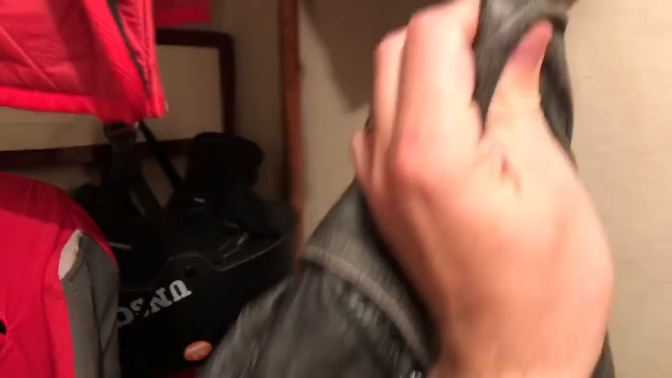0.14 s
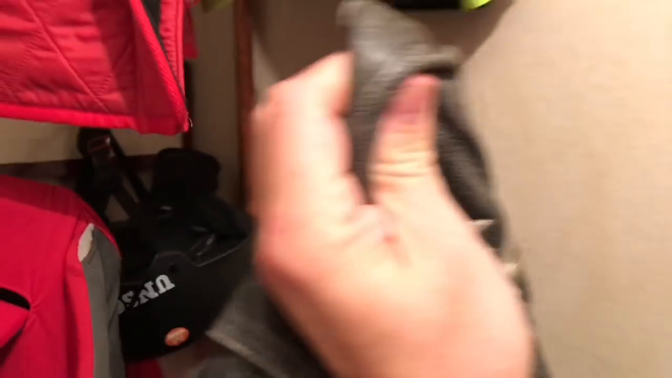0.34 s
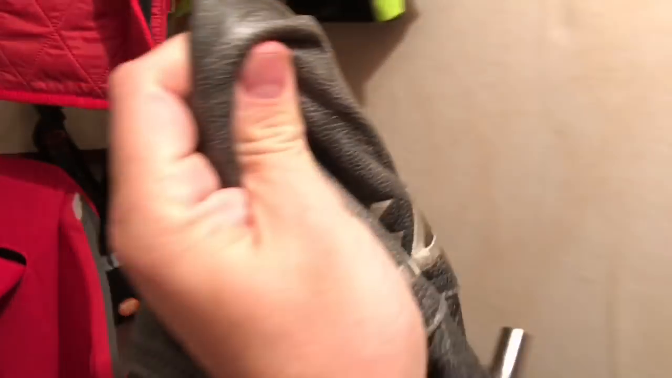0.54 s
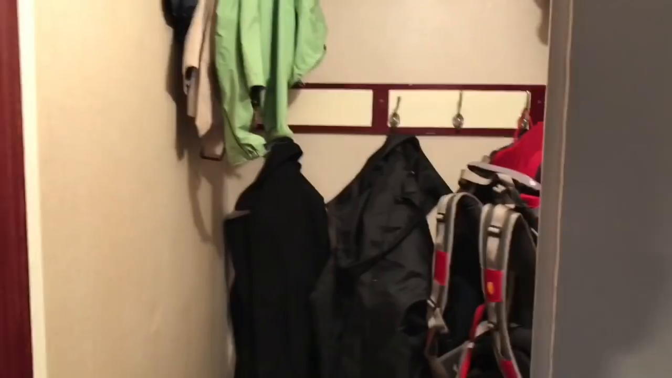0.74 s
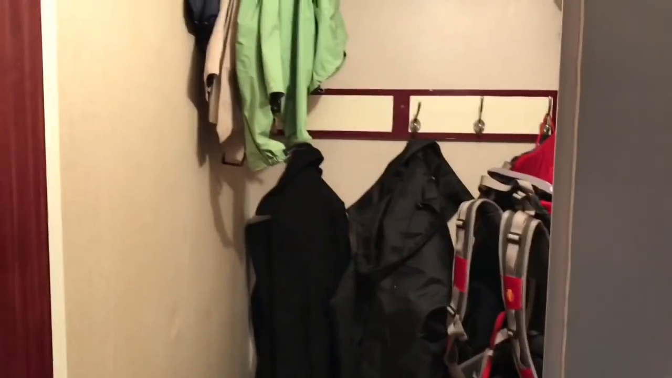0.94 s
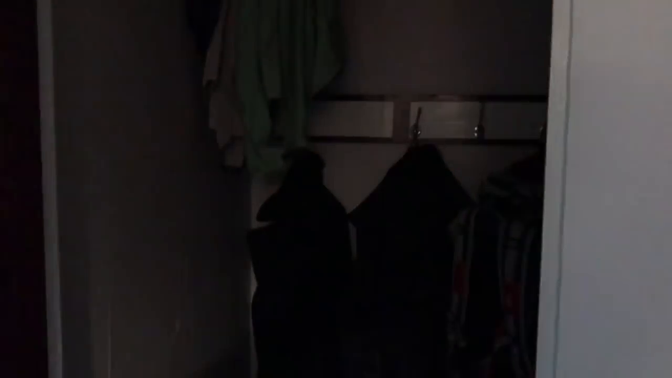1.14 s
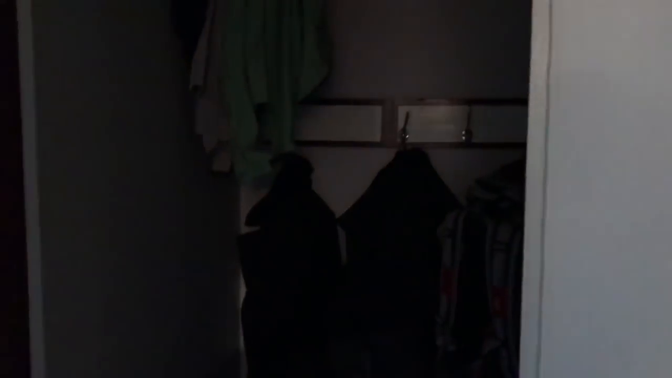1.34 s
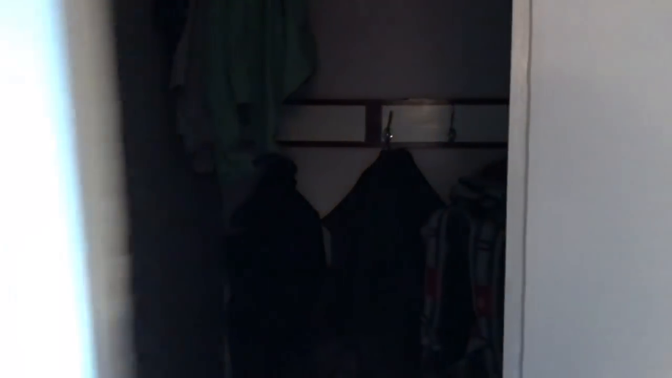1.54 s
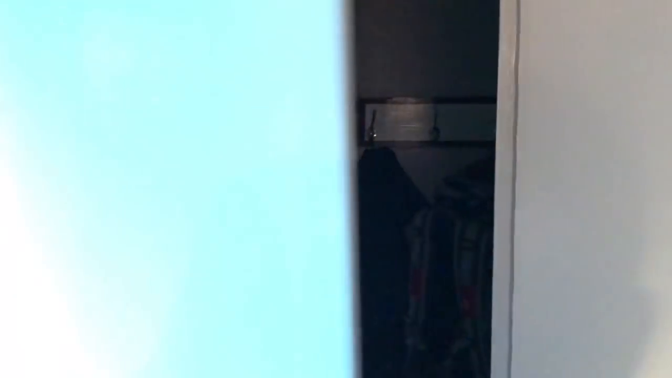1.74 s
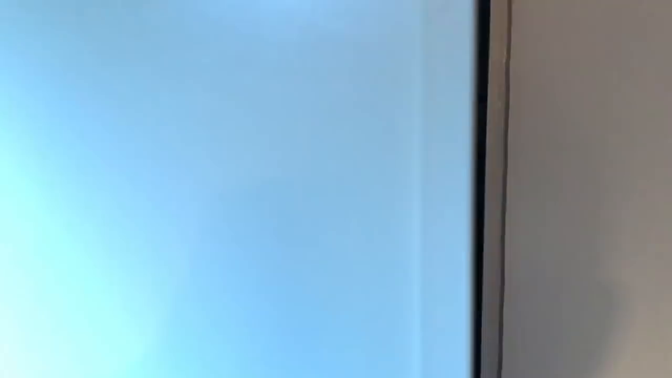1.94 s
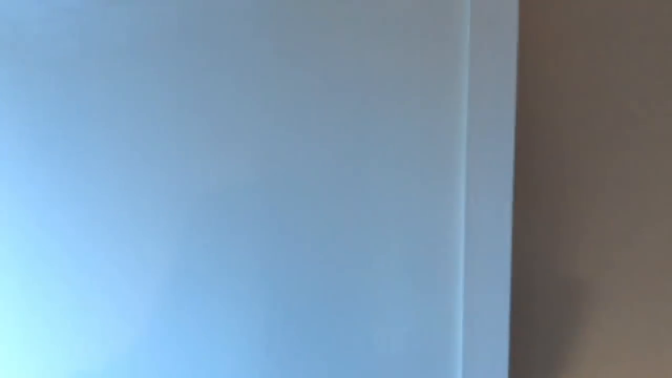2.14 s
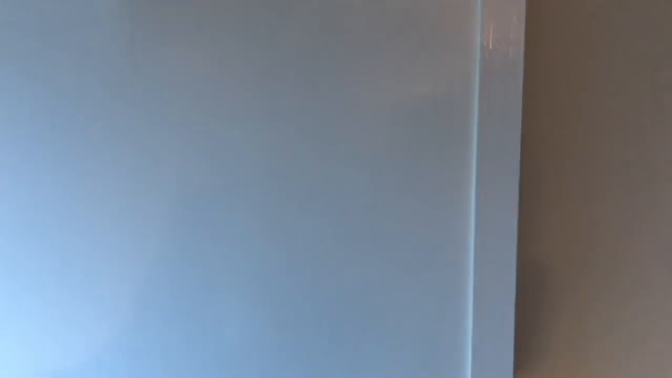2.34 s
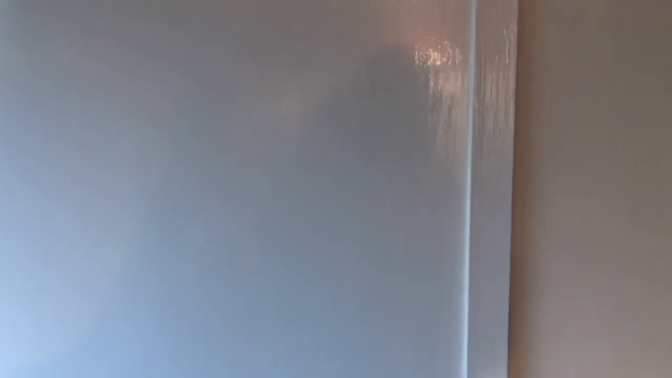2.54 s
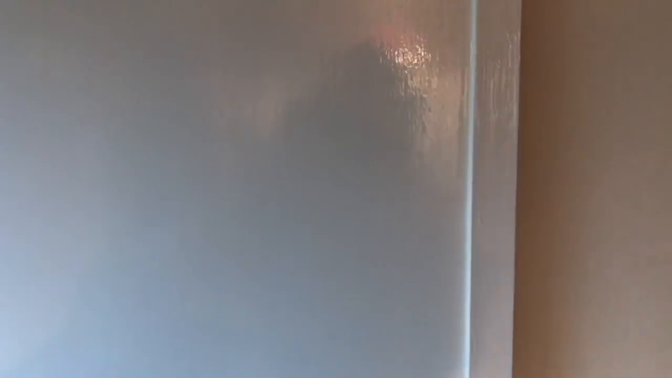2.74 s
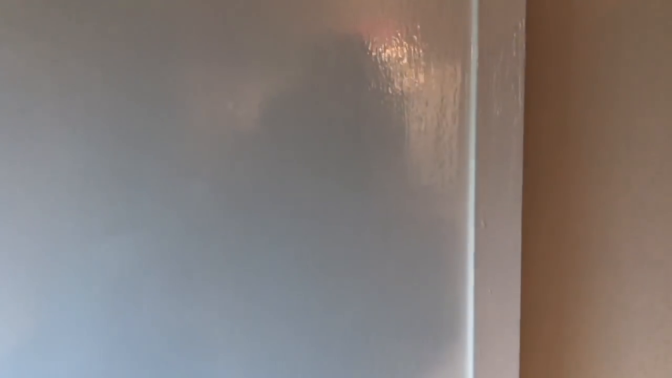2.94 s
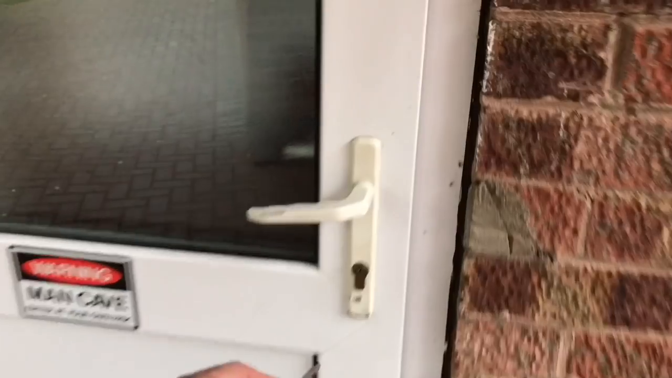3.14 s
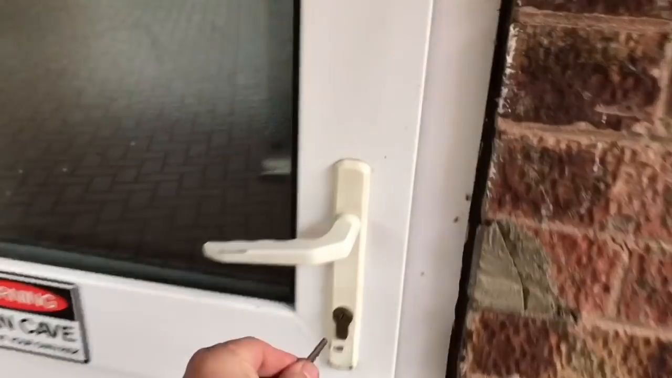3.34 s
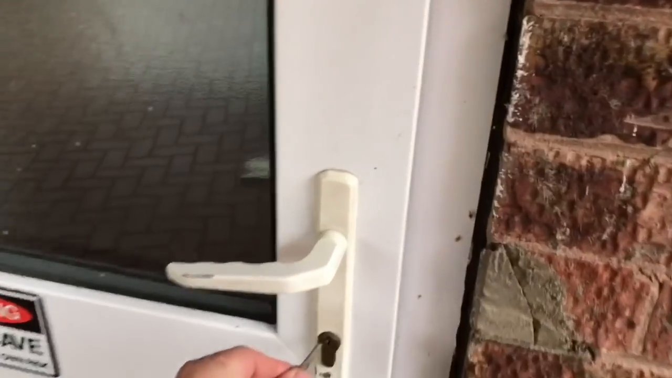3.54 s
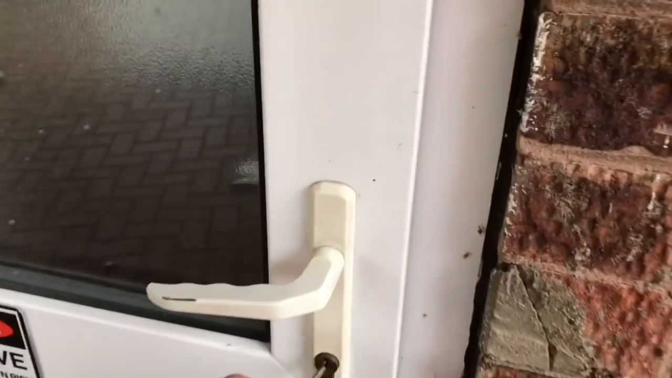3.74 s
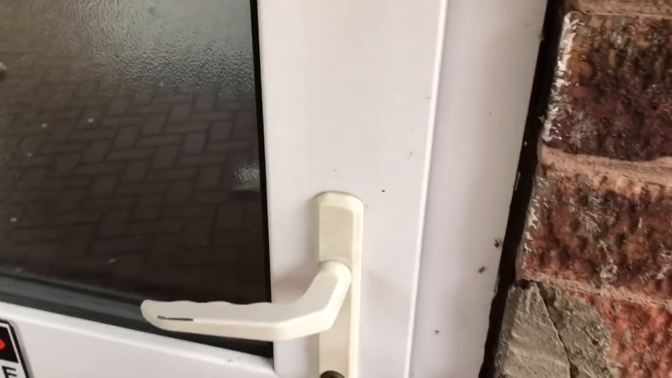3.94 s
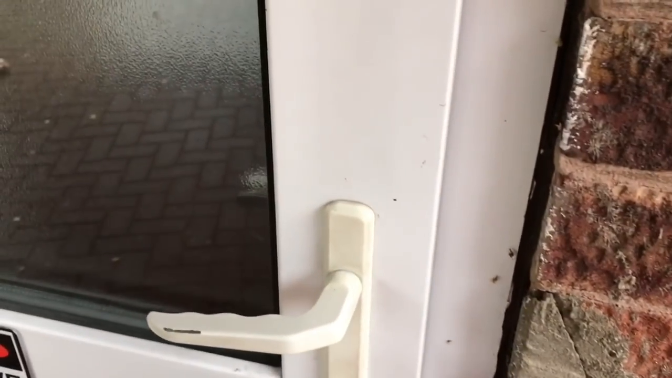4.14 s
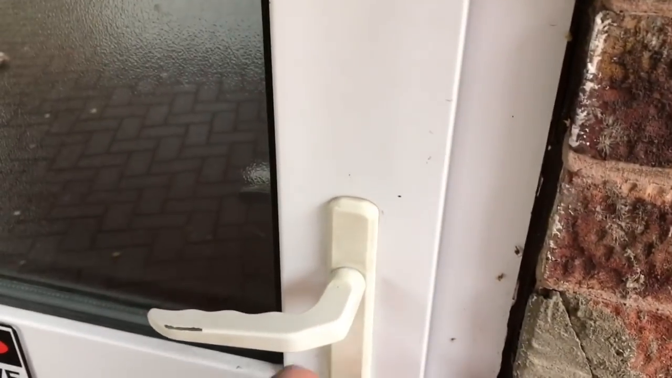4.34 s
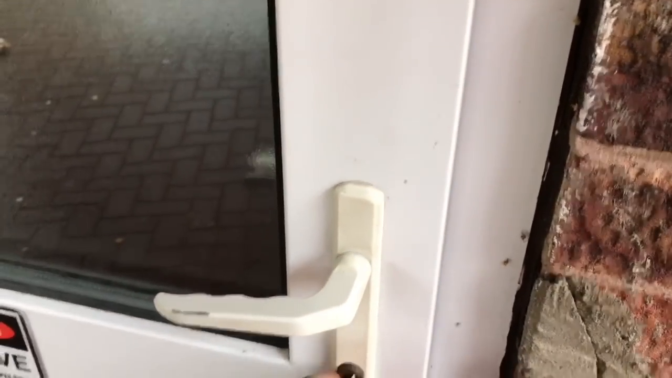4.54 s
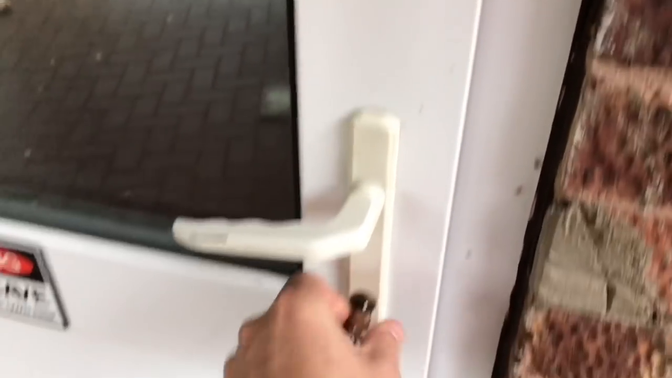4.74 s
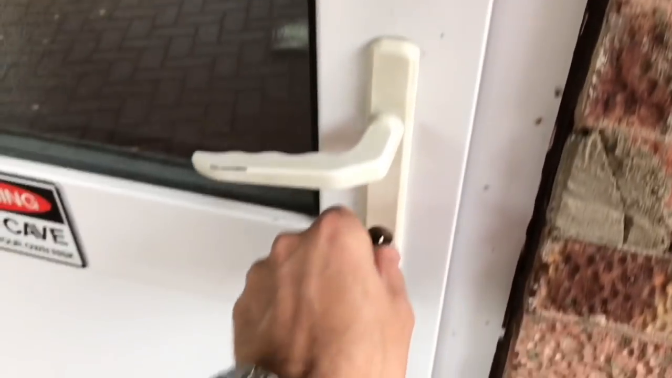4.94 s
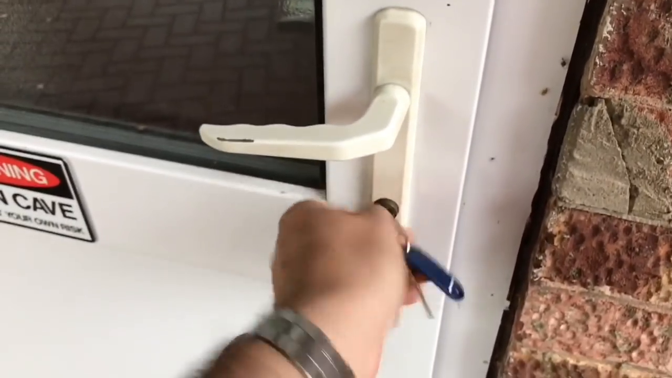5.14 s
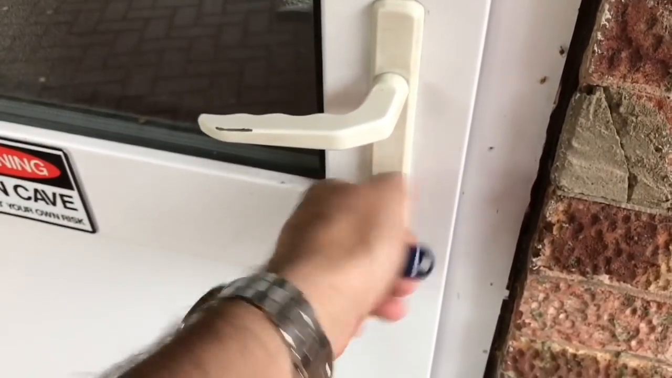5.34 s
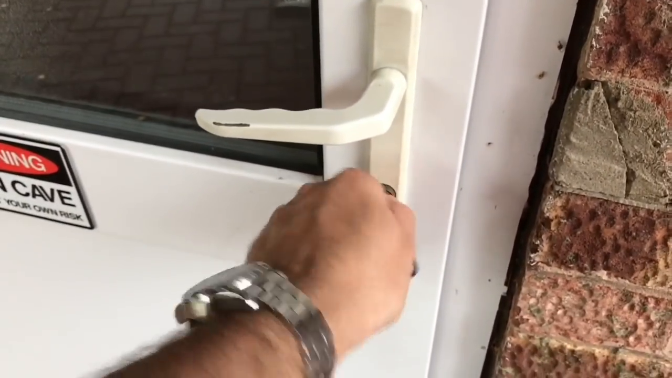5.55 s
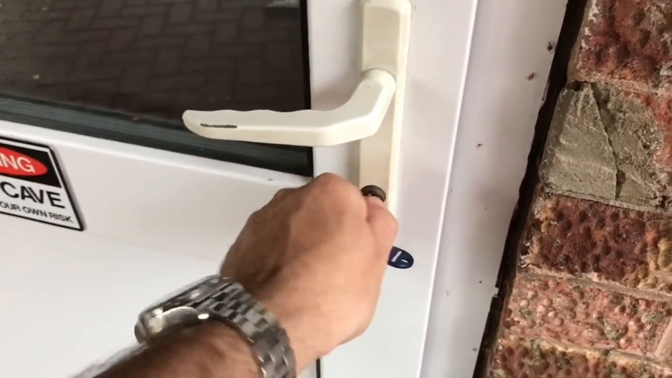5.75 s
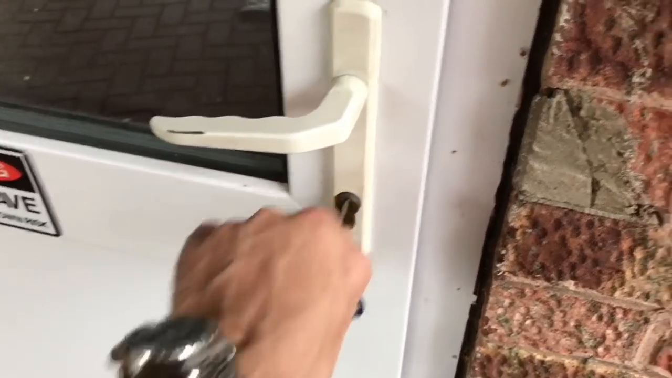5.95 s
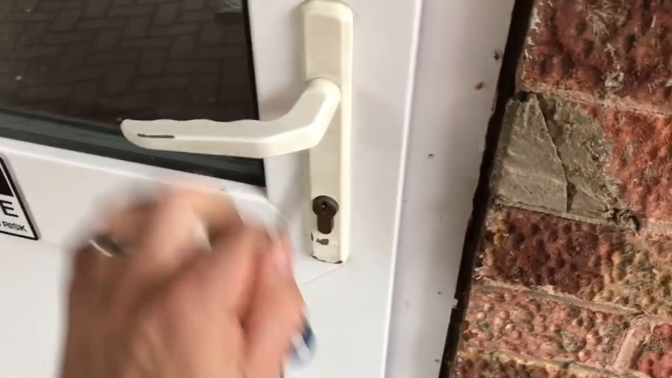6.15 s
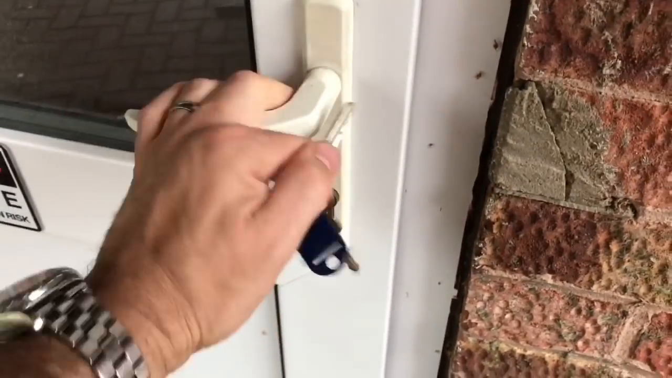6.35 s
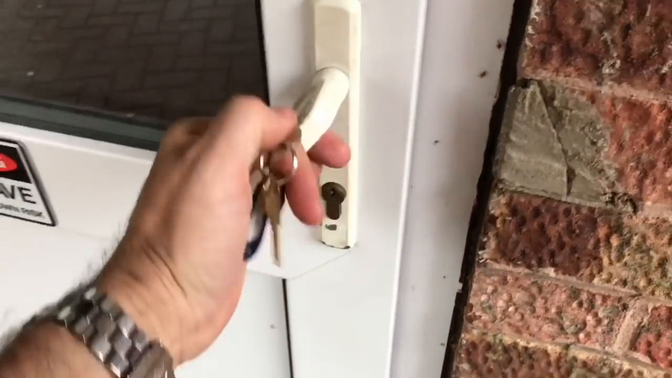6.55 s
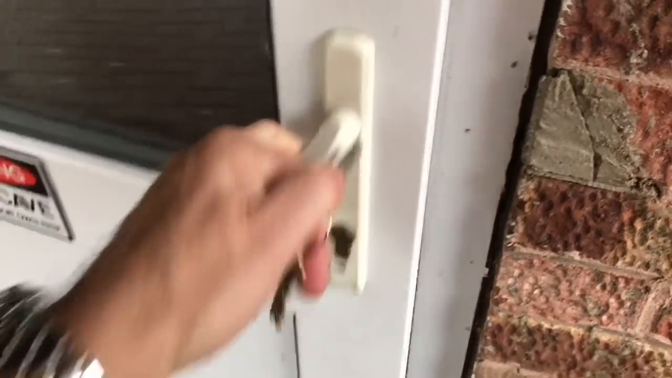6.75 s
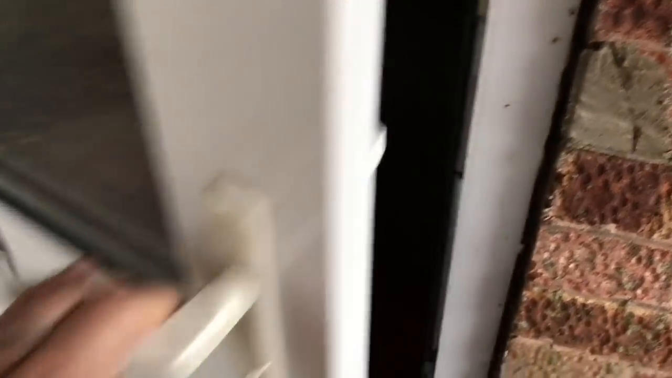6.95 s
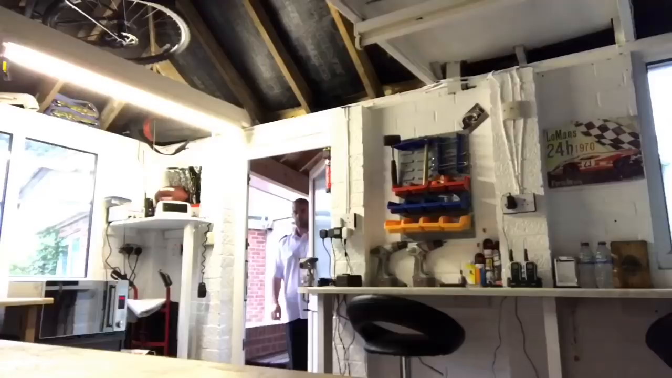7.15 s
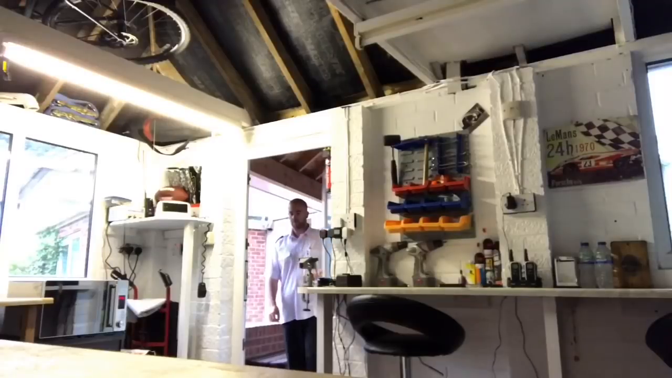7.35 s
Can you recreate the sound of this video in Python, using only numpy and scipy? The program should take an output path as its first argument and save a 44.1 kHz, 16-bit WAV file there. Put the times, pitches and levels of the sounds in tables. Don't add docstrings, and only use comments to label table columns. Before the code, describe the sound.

Coat rustles off a hook, a light switch snaps, a door squeals and slams, then keys jingle and click in a plastic-cased lock.

```python
import sys
import numpy as np
from scipy import signal
from scipy.fft import rfft, irfft, next_fast_len
from scipy.io import wavfile

SR = 44100
rng = np.random.default_rng(int(sys.argv[2]) if len(sys.argv) > 2 else 0)


def undo_db(level):
    steps = np.asarray(level, float) / 20
    return 10 ** steps


def waveform_to_disk(signal):
    frames = np.transpose(np.atleast_2d(signal))
    scaled = np.clip(frames, -1, 1) * 32767
    samples = np.round(scaled).astype(np.int16)
    wavfile.write(sys.argv[1], SR, samples)


N = 330309
T = np.arange(N) / SR


def white(n=N):
    return rng.standard_normal(n)


def rms_one(x):
    return x / np.sqrt(np.mean(x ** 2) + 1e-20)


def band(x, low_hz, high_hz, order=2):
    edges_hz = [low_hz, min(high_hz, .45 * SR)]
    return signal.sosfilt(signal.butter(order, edges_hz, "band", fs=SR, output="sos"), x)


def drift(rate_hz):
    r = np.exp(-2 * np.pi * rate_hz / SR)
    return rms_one(signal.lfilter([1], [1, -2 * r, r * r], white(N + SR))[SR:])


def grains(per_s, spread_db):
    size = undo_db(spread_db * np.minimum(rng.exponential(1, N), 5)) * rng.choice([-1, 1], N)
    return size * (rng.random(N) < per_s / SR)


def coloured(x, spectrum):
    size = next_fast_len(N)
    hz = np.maximum(np.fft.rfftfreq(size, 1 / SR), 1)
    points_hz, points_db = np.transpose(spectrum)
    gain = undo_db(np.interp(np.log(hz), np.log(points_hz), points_db, left=-90))
    return rms_one(irfft(rfft(x, size) * gain, size)[:N])


def resonate(x, peaks):
    out = 0
    for k, (hz, width_hz, db) in enumerate(peaks):
        r = np.exp(-np.pi * width_hz / SR)
        a = [1, -2 * r * np.cos(2 * np.pi * hz / SR), r * r]
        out = out + (-1) ** k * undo_db(db) * signal.lfilter([(1 - r * r) / 2, 0, (r * r - 1) / 2], a, x)
    return out


def decays(times_s, dbs, t60s, rise_s):
    out = np.zeros(N)
    for s, db, t60 in zip(times_s, dbs, t60s + np.array(0.012)):
        i = round(s * SR)
        t = T[:min(round(1.2 * t60 * SR), N - i)]
        out[i:i + len(t)] += undo_db(db - 60 * t / t60) * (1 - np.exp(-t / rise_s))
    return out


def stroke(peak_s, rise_s, fall_s, db):
    away = np.where(T < peak_s, (peak_s - T) / rise_s, (T - peak_s) / fall_s)
    return undo_db(db - 20 * np.minimum(away, 8))


def in_time(rows):
    s, *columns = np.transpose(rows)
    return [np.interp(T, s, c) for c in columns], (T >= s[0]) & (T <= s[-1])


JOINS_S = [.757, 3.19, 7.228]


def in_take(values, s):
    return np.array(values)[np.searchsorted(JOINS_S, s)]


def ringing(rows, t60s):
    return [(*row, in_take(t60s, row[0])) for row in rows]


# (frequency [Hz], density [dB/Hz])
HALL_AIR = [(88, -28), (150, 4), (494, -1.5), (7320, -14), (7920, -21), (9630, -17), (16000, -15.5)]
STREET_AIR = [(88, -15), (150, -4), (259, -5), (291, -3.5), (321, -9), (1170, -5), (1900, -12.5),
              (3290, -13.5), (7620, -28), (16000, -35)]
GARAGE_AIR = [(88, -41), (150, -17.5), (226, -10), (1080, -7), (1690, -8), (2360, -17.5), (7040, -25.5),
              (16000, -38)]


def air():
    take = np.searchsorted(JOINS_S, T)
    places = [(HALL_AIR, -65.5, 0), (HALL_AIR, -65.5, 0), (STREET_AIR, -47.5, -1.5), (GARAGE_AIR, -55, 0)]
    out = 0
    for k, (spectrum, rms_db, db_per_s) in enumerate(places):
        level_db = rms_db + 0.25 * drift(2.2) + db_per_s * (T - T.mean())
        out = out + (take == k) * undo_db(level_db) * coloured(white(), spectrum)
    return out


HAND_DB = [-54, -54, -49.5, -54]
# (peak time [s], rise [s], fall [s], level [dB])
SHUDDER = [
    (2.97, 0.21, 0.37, -38),
    (3, 0.1, 0.19, -55),
    (4, 0.99, 2.3, -54.5),
    (5.85, 0.52, 0.55, -57),
    (6.3, .5, 0.83, -54),
]
# (time [s], level [dB], pitch [Hz])
BUMPS = [(.042, -38, 101), (.06, -37, 286), (.33, -37.5, 81.6), (.345, -40.5, 333), (.455, -43, 364),
         (.415, -30, 76), (.56, -32.5, 237), (.64, -35.5, 73), (1.031, -31.5, 69), (1.033, -34.5, 171),
         (1.17, -36, 63.3), (1.352, -35, 169), (1.37, -33, 334), (1.408, -33, 177), (1.448, -35, 70),
         (2.862, -30.5, 300), (3.13, -29.5, 130), (3.599, -34, 70.0), (4.138, -27.5, 69),
         (4.371, -26.5, 59.5), (4.388, -38, 61), (4.577, -29.5, 84), (5.15, -27, 104), (5.965, -30, 94),
         (5.999, -25, 57), (6.07, -40, 70.5), (6.392, -24, 77), (6.849, -30.5, 50.6)]
BUMP_T60_S = [0.27, 0.22, 0.16, .13]


def rumble():
    noise = rms_one(band(white(), 35.6, 107.8) * undo_db(1.2 * drift(29)))
    hand = undo_db(in_take(HAND_DB, T) + 1.4 * drift(2.5))
    out = noise * (hand + sum(stroke(*row) for row in SHUDDER))
    bumps = ringing(BUMPS, BUMP_T60_S)
    s, db, _, t60 = np.transpose(bumps)
    out += rms_one(band(white(), 101, 317)) * decays(s, db - 15, 1.54 * t60, rise_s=0.00076)
    for s, db, hz, t60 in bumps:
        swing = np.sin(2 * np.pi * hz * (T - s))
        out += swing * decays([s], [db - 2], [t60 * (70 / hz) ** 0.83], rise_s=0.0022)
    return out


# (frequency [Hz], density [dB/Hz])
RUB_COLOUR = [(120, -56), (200, 1.5), (735, -2.5), (1060, 1.5), (1180, -4), (1680, -5), (2510, -10.5),
              (15100, -31.5), (16000, -28)]
# (peak time [s], rise [s], fall [s], body level [dB], hiss over body [dB])
DRAGS = [
    (.08, 0.38, 0.3, -57, 3),
    (.4, 0.39, 0.32, -52.5, 1),
    (0.633, 0.025, 0.13, -49.5, 2),
    (.05, 0.032, 0.046, -51.5, -9),
    (.12, 0.019, 0.082, -52.5, -12),
    (.33, 0.035, 0.065, -62, -10),
    (.43, 0.023, 0.068, -52, -18),
    (0.559, .02, 0.025, -52, -11),
]
# (peak time [s], rise [s], fall [s], body level [dB], hiss over body [dB])
STROKES = [(1.038, 0.016, 0.32, -58.5, -0.5), (1.47, 0.34, 0.16, -55, -6.5), (1.51, 0.062, 0.7, -54.5, -13),
           (3.142, 0.031, 0.054, -47, 0.5), (3.611, 0.038, 0.17, -37, -4.5),
           (5.151, 0.038, 0.015, -39.5, -16), (6.553, 0.11, 0.16, -37.5, -8.5)]


def rubbing():
    cloth_body = rms_one(band(grains(2500, spread_db=1.5), 95, 1120))
    cloth_hiss = rms_one(band(grains(4000, spread_db=2), 940, 6800, order=1))
    body = rms_one(band(coloured(grains(3000, spread_db=-2), RUB_COLOUR), 156, 2600))
    hiss = rms_one(band(coloured(grains(5600, spread_db=2.5), RUB_COLOUR), 3000, 16400))
    coat = sum(stroke(*row) * (cloth_body + undo_db(hiss_db) * cloth_hiss) for *row, hiss_db in DRAGS)
    others = sum(stroke(*row) * (body + undo_db(hiss_db) * hiss) for *row, hiss_db in STROKES)
    return (T < JOINS_S[0]) * coat + others


# (time [s], level [dB])
PINS = [(.0333, -35), (.629, -25), (2.6395, -17), (2.648, -18), (2.6874, -17.5), (3.608, -19.5),
        (3.724, -27), (3.729, -26), (3.004, -43), (6.826, -30), (5.482, -32), (6.586, -16), (4.0482, -32.5),
        (4.3334, -31), (4.578, -22), (4.637, -20.5), (4.655, -30), (5.1196, -25), (5.2885, -29),
        (5.455, -24.5), (5.4644, -28), (5.9836, -16.5), (6.0804, -43), (6.5091, -25), (6.5221, -15),
        (6.5455, -18), (6.572, -13.5), (6.7232, -23), (6.8084, -29), (7.2064, -23)]
# (time [s], level [dB])
RING = [(2.473, -15.5), (3.579, -32), (3.763, -43), (6.326, -44), (6.897, -36), (7.149, -43), (4.1485, -24),
        (4.2961, -25.5), (4.3054, -37), (4.3236, -24), (4.348, -24), (4.362, -28), (4.37, -19),
        (4.4573, -39), (4.5264, -30.5), (4.5446, -36), (4.5635, -27), (4.63, -26), (4.6914, -17.5),
        (4.7183, -12), (4.8113, -29), (4.893, -38), (5.373, -32), (6.0277, -25), (6.0432, -25),
        (6.0654, -20), (6.2342, -24)]
# (time [s], level [dB])
SNAGS = [(2.056, -19), (2.0894, -24), (2.138, -26), (2.1844, -24), (2.232, -25), (2.249, -25), (2.294, -25),
         (2.308, -27), (2.279, -24), (2.3251, -27)]
# (time [s], level [dB], pitch [Hz])
SNAPS = [(1.1122, -0.5, 8800), (1.1146, -10.5, 5500), (1.121, -13, 7000), (1.517, -58, 5520),
         (2.7506, -20, 4500), (4.1385, -24.5, 6380), (4.3854, -10, 9500), (5.1552, -6.5, 6800),
         (5.5603, -16.5, 4320), (5.9768, -21.5, 5330), (6.0721, -15.5, 11400), (6.4183, -17, 11600),
         (6.7088, -16, 6940), (6.8453, -18, 4480)]
SNAP_T60_S = [.21, 0.16, 0.094, .09]


def ticks():
    dull = PINS + [(s, db) for s, _, db in CATCHES] + [(s, db - 6) for s, db, *_ in LATCH]
    thin = RING + [(s, max(rings_db) + 16.5) for s, *rings_db in JINGLE]
    small = [(*row, 4870, .025) for row in dull] + [(*row, 13200, .025) for row in thin]
    small += [(s, db + 2.5, 11000, .025) for s, db in SNAGS]
    s, db, pitch_hz, t60 = np.transpose(ringing(SNAPS, SNAP_T60_S) + small)
    out, noise, rattle = 0, white(), rms_one(grains(200, spread_db=2.5))
    bands_hz = [(3800, 5760), (5200, 6330), (6700, 8100), (8400, 10200), (10300, 11900), (12600, 15200)]
    for low, high in bands_hz:
        octaves_off = abs(np.log2(pitch_hz / np.sqrt(low * high)))
        colour_db = 2.5 * (t60 < .03) * white(len(s))
        level_db = db - 5.6 * octaves_off - 1.5 + colour_db
        cracks = np.zeros(N)
        np.add.at(cracks, (s * SR).astype(int), undo_db(level_db + 1))
        burst = decays(s, level_db - 17, 0.00044 + 0.038 * t60, rise_s=.0001)
        burst += decays(s, level_db - 30.5, t60 * (low / 7500) ** -.5, rise_s=0.0006)
        after = rattle * decays(s, level_db - 29, .08 + 0 * s, rise_s=.002)
        out = out + rms_one(band(noise, low, high)) * burst + band(cracks + after + 1e-18, low, high)
    return out


# (time [s], level [dB], pitch [Hz])
KNOCKS = [(.035, -42, 1410), (.116, -41, 755), (.232, -40.5, 870), (.414, -41, 920), (.629, -38, 830),
          (1.022, -43, 2080), (1.115, -31, 1300), (1.113, -40, 654), (1.512, -36.5, 1040),
          (1.523, -37.5, 1050), (1.559, -51, 1090), (1.699, -58, 1070)]
# (time [s], level [dB], pitch [Hz])
LOCK_KNOCKS = [(3.596, -26, 480), (3.609, -33, 930), (3.64, -31, 520), (3.647, -27.5, 1750),
               (3.662, -27, 1700), (3.681, -26, 1750), (4.141, -29.5, 1700), (4.385, -28.5, 2930),
               (4.578, -29, 1280), (5.1558, -27.5, 1520), (5.163, -30, 452), (5.5633, -28, 1440),
               (5.977, -26.5, 1010), (6.0728, -32, 1220), (6.3978, -27, 1240), (6.408, -29, 600),
               (6.5227, -25, 1420), (6.547, -25, 1030), (6.5702, -27, 1140), (6.8448, -30.5, 1040),
               (6.853, -34.5, 450), (5.81, -38.5, 1790)]
# (time [s], level [dB], pitch [Hz], t60 [s])
LATCH = [(1.1585, -21, 2110, 0.011), (1.705, -53, 2050, .2), (1.745, -47, 2100, .15),
         (1.7765, -41, 2030, 0.18), (1.515, -35, 1130, 0.36), (2.751, -27.5, 1930, 0.093),
         (2.874, -31.5, 2060, 0.037), (2.995, -28.5, 2130, .1), (3.003, -38, 1660, 0.15)]
KNOCK_T60_S = [0.094, 0.22, 0.057, .06]
# (frequency [Hz], width [Hz], level [dB])
LOCK_CASE = [(660, 300, 12), (973, 153, 18.5), (1700, 76, 15.5), (2080, 54, 11), (2680, 1150, 10.5)]


def knocks():
    case_width, latch_width = 0.51, 0.14
    case = ringing(KNOCKS + LOCK_KNOCKS, KNOCK_T60_S)
    s, db, _, t60 = np.transpose(case)
    out = rms_one(resonate(white(), LOCK_CASE)) * decays(s, db - 10.5, 1.05 * t60, rise_s=0.0001)
    noise, n = white(), SR // 4
    for s, db, hz, t60, width in [(*row, case_width) for row in case] + [(*row, latch_width) for row in LATCH]:
        i = round(s * SR)
        peak = [(hz, width * hz, 0)]
        tone = rms_one(resonate(resonate(noise[i:i + n], peak), peak))
        out[i:i + n] += tone * decays([0], [db - 7], [t60], rise_s=0.00038)[:n]
    return out


# (time [s], level [dB], pitch [Hz], t60 [s])
PINGS = [(1.1122, -14.5, 8540, 0.009), (1.1169, -28, 625, 0.028), (1.159, -25, 2500, .01),
         (1.1593, -27, 1810, 0.011), (6.7088, -19.5, 5340, 0.0047), (6.7093, -32, 10900, 0.019),
         (6.7234, -26.5, 5000, 0.0055), (4.3858, -30.5, 2950, 0.027), (4.386, -19.5, 9500, .008),
         (4.3862, -20, 14500, .008), (4.711, -20, 14000, .006), (4.452, -50, 13600, .06),
         (4.578, -35, 4300, .015), (4.636, -38, 5100, 0.013), (4.1412, -33, 1700, 0.024),
         (5.364, -24, 13800, .01), (5.3735, -30, 14600, .006), (5.383, -30, 13800, .008)]


def pings():
    out, t = np.zeros(N), T[:SR // 20]
    for s, db, hz, t60 in PINGS:
        out[round(s * SR):][:len(t)] += undo_db(db - 60 * t / t60) * np.sin(2 * np.pi * hz * t)
    return out


def flexing(x, peaks, upper_db=0):
    out = 0
    for k, peak in enumerate(peaks):
        level_db = 1.8 * drift(14) + (peak[0] > 2700) * upper_db
        out = out + (-1) ** k * resonate(x, [peak]) * undo_db(level_db)
    return out


# (time [s], slip rate [Hz], sweep speed [dB], roughness [0-1])
SEAL = [(1.77, 796.2, -11, 0.73), (1.91, 745, -25, 0.32), (1.925, 575, -10, 0.15), (2.01, 514.7, 5, 0.19),
        (2.05, 467, -1.5, 0.4), (2.075, 395.2, 0.5, 0.41), (2.225, 373.2, 1.5, .45),
        (2.24, 310.2, 3.5, 0.4), (2.29, 314.9, -6, 0.45)]
# (time [s], slip rate [Hz], sweep speed [dB], roughness [0-1])
CLOSING = [(2.31, 385.6, -11, .5), (2.361, 384.4, -4, .25), (2.45, 370, -21.5, 0.26),
           (2.529, 373.5, -9.5, 0.23), (2.576, 358.5, 11, 0.37)]
# (time [s], slip rate [Hz], level over first [dB])
SECOND = [(1.77, 720, -28), (1.86, 700, 3), (1.91, 690, -7), (1.99, 479, -11), (2.13, 440, -7.5),
          (2.28, 397.3, -10), (2.34, 364, -15), (2.576, 354, -13)]
# (frequency [Hz], density [dB/Hz])
SEAL_HISS = [(590, -28), (1000, -11), (1500, 1), (2100, 1.5), (3620, -0.5), (4170, -5), (8160, -23),
             (11300, -30.5), (16000, -35)]
# (frequency [Hz], width [Hz], level [dB])
SEAL_BANDS = [(5830, 210, -8), (7050, 150, -7), (8900, 300, -3), (9660, 280, 10), (11440, 500, 8.5),
              (13500, 600, 2)]
# (frequency [Hz], width [Hz], level [dB])
LEAF = [(1520, 69, -1), (1616, 56, -1.5), (1805, 33, 8), (1945, 71, -1), (2260, 126, -0.5),
        (2597, 83, -3.5), (2950, 110, -6), (3160, 71, -10), (3680, 200, -3.5), (3900, 110, -7),
        (4430, 260, -2), (5140, 180, -7)]


def seal():
    (hz, speed_db, rough), on = in_time(SEAL + CLOSING)
    onset = np.clip((T - SEAL[0][0]) / 0.059, 0, 1)
    rough = np.clip(rough, .05, 1)
    light_hz = 710
    grip_db = -7.5 / (1 + (light_hz / hz) ** 12)
    throb = (T > CLOSING[0][0]) * np.cos(2 * np.pi * 7.74 * (T - 2.375))
    squeal_db = -36 + 0.067 * speed_db + 0.38 * grip_db + 4.5 * throb
    leaf_db = -31 + 0.039 * speed_db + grip_db + 0.4 * 4.5 * throb
    hiss_db = -33 + speed_db
    hz = hz * (1 + 0.012 * throb)

    (other_hz, other_db), _ = in_time(SECOND)
    other_phase = np.cumsum(other_hz * (1 + 0.016 * drift(20) + .01 * drift(200))) / SR
    other = np.diff(np.floor(other_phase), prepend=0) * undo_db(other_db + 2.5 * drift(30))

    skips = .12 * np.tanh(3 * drift(9))
    phase = np.cumsum(hz * (1 + rough * (.05 * drift(18) + .05 * drift(200) - skips))) / SR
    slips = np.diff(np.floor(phase), prepend=0) * undo_db(rough * (3 * drift(25) + 4 * drift(300)))
    gated = white() * (2 + np.exp(-3 * (phase % 1))) * undo_db(2 * drift(59))
    source = rms_one((slips + other) * np.sqrt(400 / hz)) + rough ** 1.6 * rms_one(gated)
    bright = coloured(source + (.08 + .45 * rough) * gated, SEAL_HISS)

    squeal = band(source + .6 * rough * rms_one(gated), 286, 873) * undo_db(3 * drift(23.4))
    squeal += 0.28 * (hz / 520) ** 2 * band(source, 800, 1260) * undo_db(3 * drift(22))
    leaf_gain = 5.4 / (1 + 0.6 * (hz / light_hz) ** 6)
    leaf = band(0.35 * bright + leaf_gain * flexing(bright, LEAF, 0.13 * speed_db), 1150, 5300)
    hiss = band(bright + flexing(bright, SEAL_BANDS), 4560, 20000) * undo_db(1.2 * drift(90))
    layers = [(squeal, squeal_db), (leaf, leaf_db), (hiss, hiss_db)]
    return on * onset * sum(undo_db(db) * x / np.std(x[on]) for x, db in layers)


def hallway(x):
    t = T[:SR // 2]
    tail = white(len(t)) * undo_db(-60 * t / 0.94) * (t > .006)
    tail = signal.lfilter([.45], [1, -.55], tail)
    return signal.fftconvolve(x, tail / np.sqrt(np.sum(tail ** 2)))[:N]


# (time [s], knock level [dB], tick level [dB])
CATCHES = [(1.777, -46, -62), (1.7949, -29, -32), (1.819, -31, -35), (1.8388, -30, -46),
           (1.862, -24.5, -23.5), (1.8705, -25, -43), (1.879, -28.5, -32), (1.887, -33, -46),
           (1.916, -22, -18), (1.9198, -25, -40), (1.9422, -20, -22), (2.0047, -24, -26)]
# (frequency [Hz], width [Hz], level [dB])
STRIP = [(2330, 260, -1.5), (3320, 270, 3.5), (4150, 270, -12), (5180, 270, -13), (6400, 340, -20)]


def catches():
    s, db, _ = np.transpose(CATCHES)
    clicks = np.zeros((len(STRIP) + 1, N)) + 1e-18
    luck_db = 3 * rng.standard_normal((len(clicks), len(s)))
    clicks[:, (s * SR).astype(int)] = undo_db(db + 25.5 + luck_db)
    peak = [(2480, 1400, 0)]
    knock = resonate(resonate(clicks[-1], peak), peak)
    strip = sum(resonate(c, [mode]) for c, mode in zip(clicks, STRIP))
    out = band(undo_db(-1.5) * knock + undo_db(1) * strip, 1730, 5900)
    return out + undo_db(-4.5) * hallway(out)


# (time [s], low push [dB], mid crash [dB], high crash [dB])
SLAM = [(2.568, -42, -5, -39), (2.577, -14, 5, -41), (2.591, -3.5, -3, -21), (2.61, 1.5, -34, -20),
        (2.6211, 3, -44, -33), (2.6471, -3, -9, -20), (2.657, -16, -21, -32), (2.6769, -5, -42, -33),
        (2.692, -20, -22, -37), (2.708, -14, -43, -40), (2.757, -15, -21, -53)]
# (frequency [Hz], level [dB], t60 [s])
DOOR_MODES = [(66.75, -3, 0.93), (104, -0.5, 0.53), (163, -14, 0.54), (235, -7.5, 0.95), (270, -6, 0.48),
              (376, -12, .25), (455, -3, 0.26), (561, -8, 0.25)]


def slam():
    s, low_db, mid_db, high_db = np.transpose(SLAM)
    pushes = np.zeros(N)
    pushes[(s * SR).astype(int)] = -undo_db(low_db)
    soft = np.exp(-2 * np.pi * 150 / SR)
    pushes = signal.lfilter([(1 - soft) ** 2], [1, -2 * soft, soft ** 2], pushes + 1e-18)
    out = 70 * band(pushes, 52, 374)
    for hz, db, t60 in DOOR_MODES:
        r, w = undo_db(-60 / (t60 * SR)), 2 * np.pi * hz / SR
        mode = signal.lfilter([0, np.sin(w)], [1, -2 * r * np.cos(w), r * r], pushes)
        out += undo_db(db - 17.5) * mode * undo_db(4.05 * drift(7.5))
    noise = white()
    out += rms_one(band(noise, 200, 700)) * decays(s, mid_db - 18.5, 0.16 + 0 * s, rise_s=0.0078)
    out += rms_one(band(noise, 530, 2560)) * decays(s, mid_db - 19, 0.15 + 0 * s, rise_s=0.00059)
    return out + rms_one(band(noise, 3300, 9200)) * decays(s, high_db - 14, 0.046 + 0 * s, rise_s=0.0011)


# (peak time [s], rise [s], fall [s], level [dB])
CHATTER = [(4.3, 0.044, 0.21, -68), (4.6, 0.11, 0.16, -49.5), (4.71, 0.043, 0.073, -46),
           (5.3, 0.061, 0.073, -46), (5.375, 0.028, .06, -48), (6.05, 0.22, 0.11, -55),
           (6.27, 0.091, 0.1, -60), (6.43, 0.068, 0.082, -45.5), (6.57, .08, .06, -62),
           (3.66, .12, 0.079, -50)]


def chatter():
    clicks, dealt = grains(3500, spread_db=4) + 1e-18, rng.integers(0, 10, N)
    rings = 0
    for k, hz in enumerate(np.geomspace(4500, 15500, 10)):
        rings = rings + resonate(clicks * (dealt == k) + 1e-18, [(hz, .06 * hz, 0)])
    return rms_one(rings) * sum(stroke(*row) for row in CHATTER)


# (time [s], small key [dB], long key [dB], broad key [dB], thin key [dB])
JINGLE = [(4.376, -55, -70, -70, -62), (4.4, -54, -70, -70, -66), (4.428, -49, -60, -73, -64),
          (4.438, -72, -72, -73, -63), (4.527, -64, -72, -66, -62), (4.546, -67, -79, -82, -71),
          (4.584, -42, -45, -59, -57), (4.589, -42, -40.5, -65, -56), (4.6194, -52, -63, -68, -68),
          (4.657, -56, -56, -61, -54), (4.692, -45, -53, -55, -48), (4.7, -41, -50, -52, -45),
          (4.7133, -37, -41, -33.5, -56), (4.7215, -39, -41, -39, -43), (4.7344, -54, -59, -63, -62),
          (5.205, -49, -62, -68, -60), (5.277, -45, -56, -49, -52), (5.289, -48, -49, -53, -59),
          (5.297, -38, -45, -47, -45), (5.3517, -28.5, -46, -36, -50), (5.364, -25.5, -43, -33, -40.5),
          (5.382, -45, -46, -36.5, -55), (5.403, -51, -66, -46, -63), (5.455, -58, -64, -65, -54),
          (6.236, -54, -63, -70, -59), (6.262, -70, -68, -67, -69), (6.277, -58, -56, -70, -58),
          (6.388, -51, -46, -42, -49), (6.4174, -34.5, -38, -44, -42), (6.4275, -34, -54, -50, -50),
          (6.44, -49, -58, -58, -59), (6.5, -58, -65, -69, -68), (6.585, -59, -57, -60, -52)]
# (time [s], small key [dB], long key [dB], broad key [dB], thin key [dB])
SLIDES = [(5.305, -25.5, -38, -47, -53), (5.312, -31, -32, -47, -48), (5.325, -30, -33, -52, -42),
          (5.338, -27, -50, -56, -52)]
# (frequency [Hz], level [dB], t60 [s])
KEY_MODES = [
    [(11685, 0, .22), (11716, -15, .15), (11900, -18, .1), (13800, -26, .06)],
    [(10750, 0, .17), (10790, -12, .1), (12300, -16, .05)],
    [(8275, 0, .16), (8320, -9, .15), (8800, -14, .08), (9400, -20, .05)],
    [(7670, 0, .15), (6890, -3, .13), (7900, -12, .06)],
]
# (time [s], level [dB], held [s])
TAG = [
    (5.2975, -48, 0.031),
    (5.3525, -51, 0.012),
]


def keys():
    touches = sorted([(*row, 0.00055) for row in JINGLE] + [(*row, 0.0045) for row in SLIDES])
    following = touches[1:] + [(N / SR, 1)]
    chance = rng.standard_normal((len(touches), 12))
    out, t = np.zeros((len(KEY_MODES), N)), T[:SR // 4]
    for (s, *key_db, rise_s), (stop_s, *_, handover_s), luck in zip(touches, following, chance):
        i = round(s * SR)
        held = 1 - np.exp(-t / rise_s)
        held *= np.exp(-np.maximum(t + s - stop_s, 0) / max(handover_s, .001))
        held *= 1 + 0.42 * np.exp(-t / 0.0039) * (rise_s < .002)
        for k, (level_db, modes) in enumerate(zip(key_db, KEY_MODES)):
            for m, (hz, db, t60) in enumerate(modes):
                mode_db = 4.5 + level_db + db + 2 * m * luck[4 + k + m]
                tone = np.sin(2 * np.pi * hz * (t + i / SR))
                out[k, i:i + len(t)] += undo_db(mode_db - 90 * t / t60) * held * tone
    tag = 0
    for s, db, held_s in TAG:
        fall = undo_db(db - 100 * (T - s) * (T > s)) * (T > s)
        tag = tag + fall * np.exp(-np.maximum(T - s - held_s, 0) / .003)
    swing = sum(ring * undo_db(1.5 * drift(30) + 2 * drift(110)) for ring in out)
    return swing + tag * np.sin(2 * np.pi * 2550 * T)


def scene():
    door = slam()
    mix = door + undo_db(-23.5) * hallway(band(door, 410, 12000))
    mix += air() + rumble() + rubbing() + ticks() + knocks() + pings()
    mix += seal() + catches() + chatter() + keys()
    fades = np.prod([np.clip(abs(T - s) / .022, .03, 1) for s in JOINS_S], axis=0)
    return (mix * fades)[None]


def top_cut(x):
    return signal.sosfilt(signal.butter(12, 17000, fs=SR, output="sos"), x)


def record(dry):
    rounded = np.tanh(signal.sosfilt(signal.butter(2, 36, "high", fs=SR, output="sos"), dry))
    mix = signal.sosfilt(signal.cheby2(16, 90, 17000, fs=SR, output="sos"), rounded)
    return top_cut(mix)


dry = scene()
out = record(dry)
waveform_to_disk(out)
```